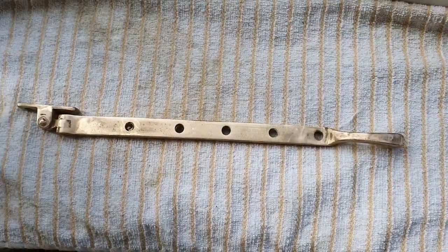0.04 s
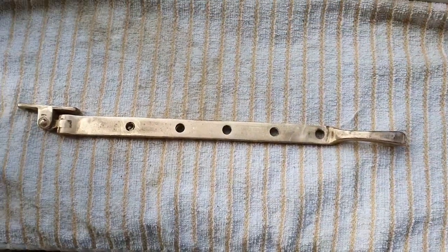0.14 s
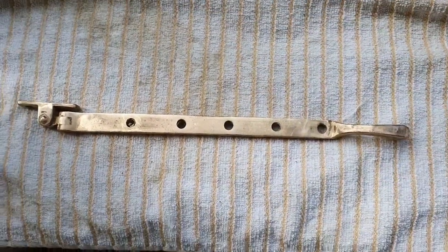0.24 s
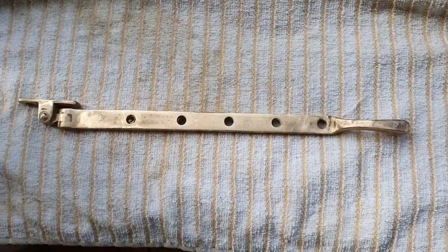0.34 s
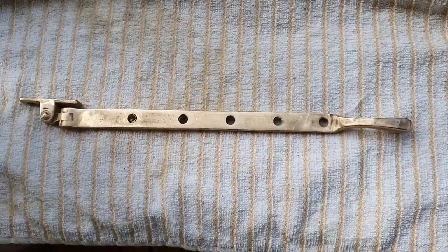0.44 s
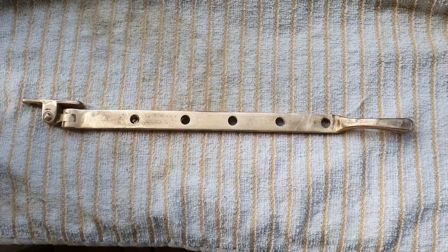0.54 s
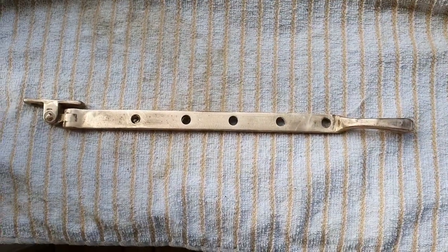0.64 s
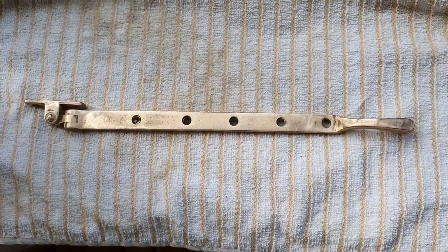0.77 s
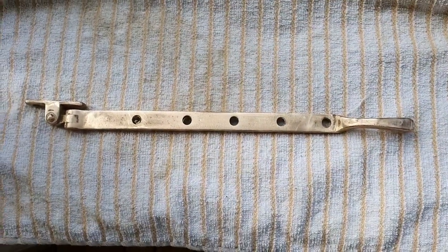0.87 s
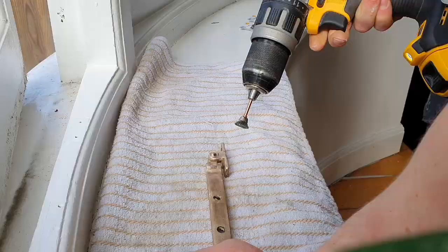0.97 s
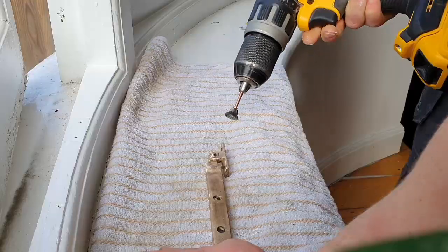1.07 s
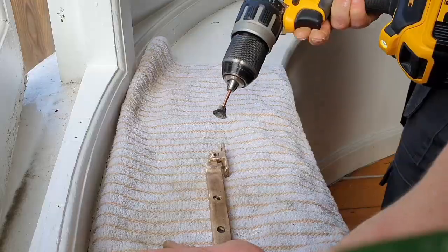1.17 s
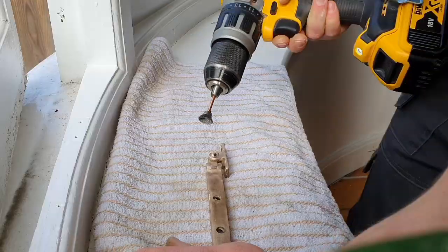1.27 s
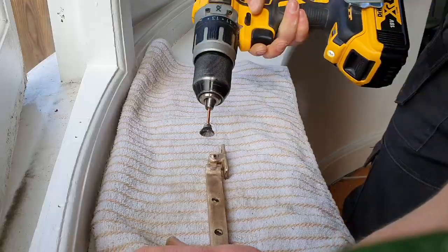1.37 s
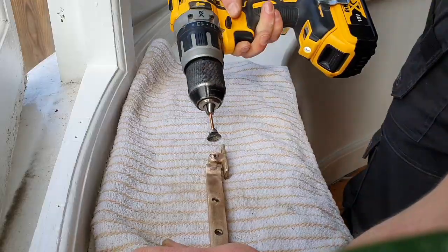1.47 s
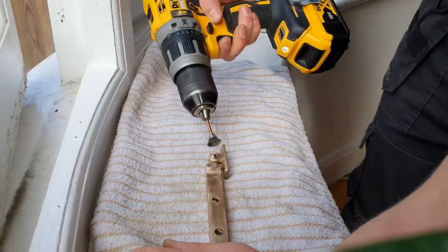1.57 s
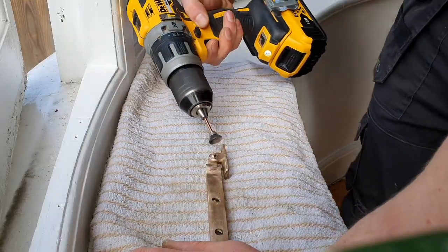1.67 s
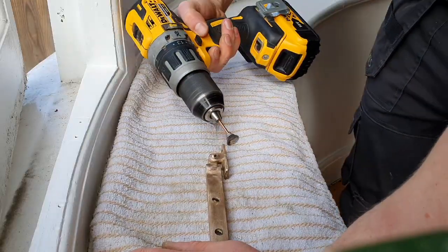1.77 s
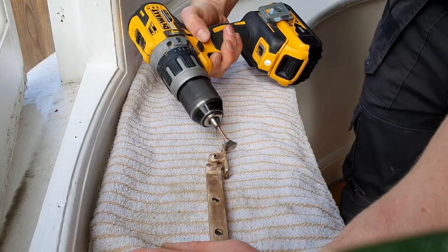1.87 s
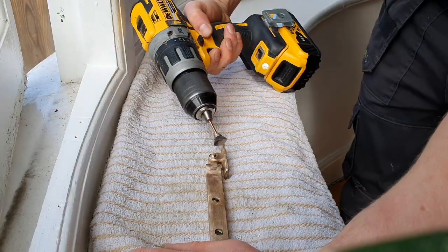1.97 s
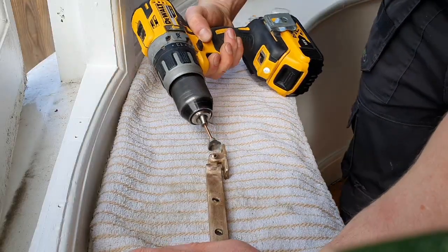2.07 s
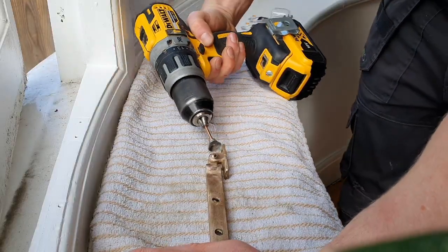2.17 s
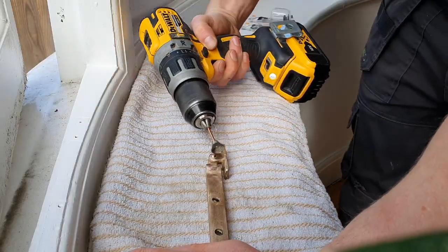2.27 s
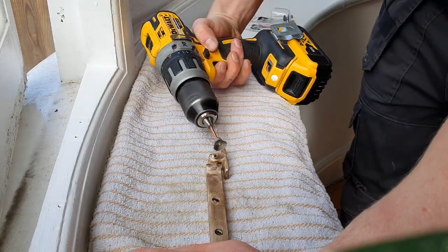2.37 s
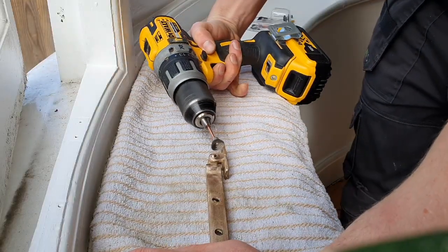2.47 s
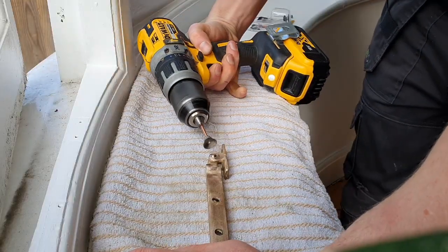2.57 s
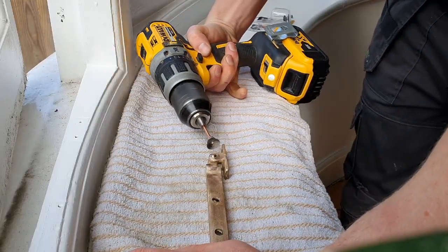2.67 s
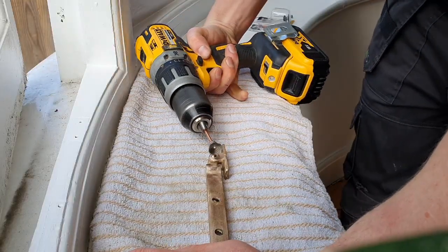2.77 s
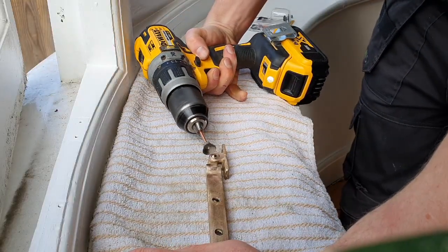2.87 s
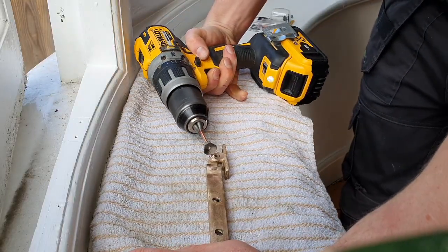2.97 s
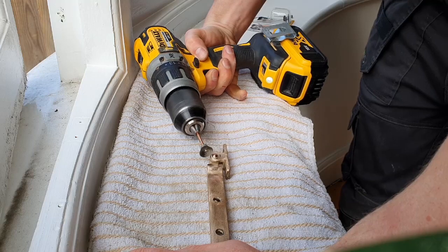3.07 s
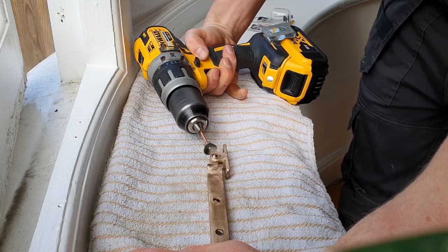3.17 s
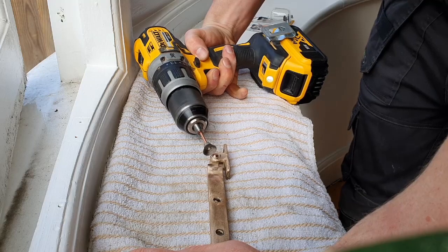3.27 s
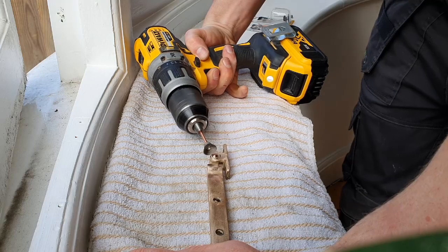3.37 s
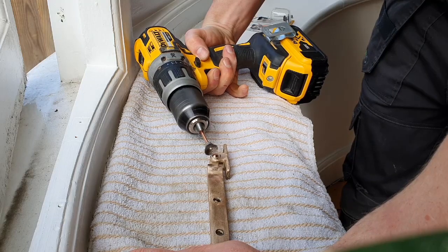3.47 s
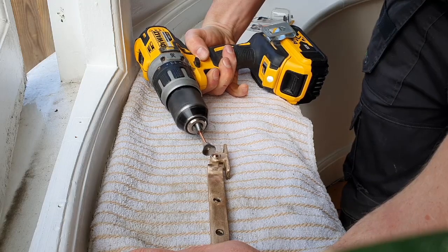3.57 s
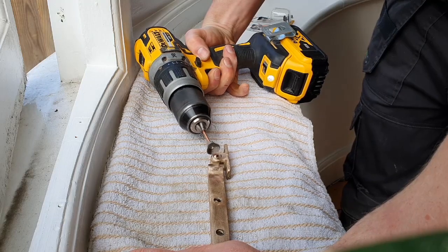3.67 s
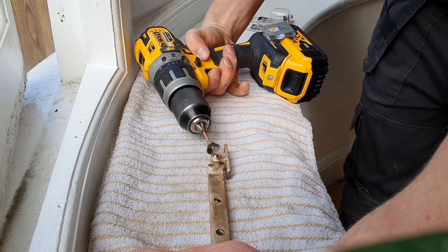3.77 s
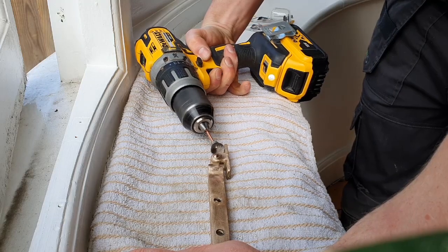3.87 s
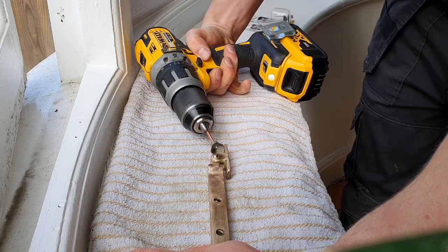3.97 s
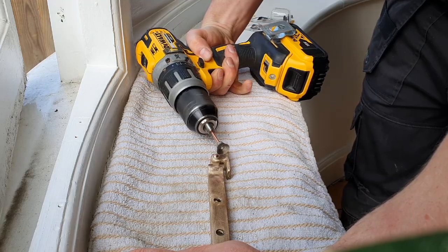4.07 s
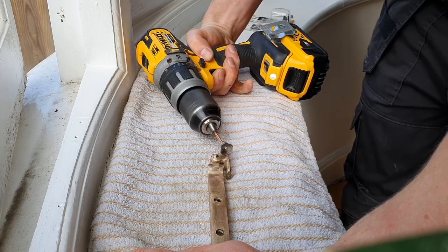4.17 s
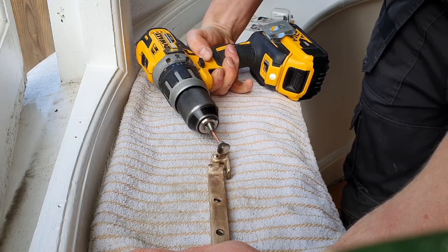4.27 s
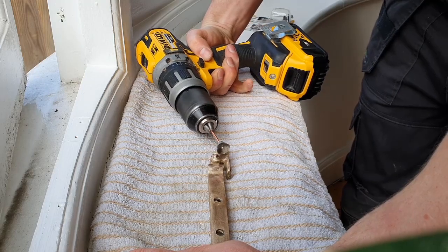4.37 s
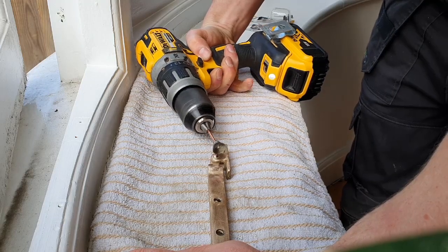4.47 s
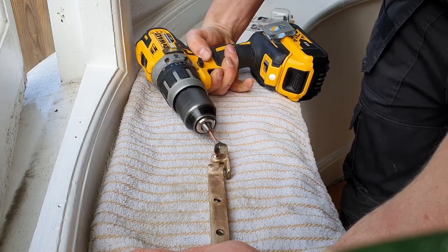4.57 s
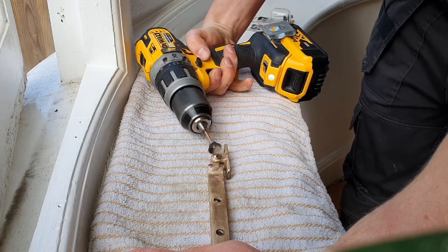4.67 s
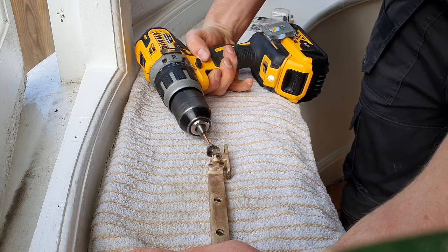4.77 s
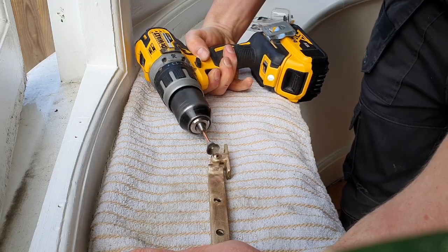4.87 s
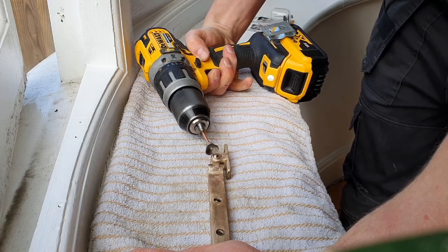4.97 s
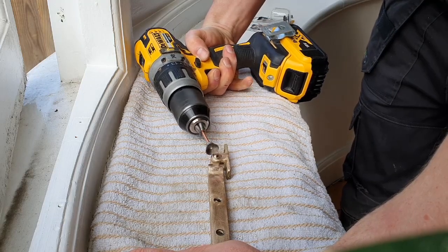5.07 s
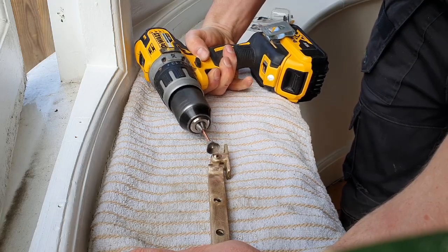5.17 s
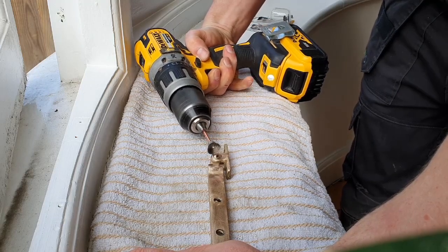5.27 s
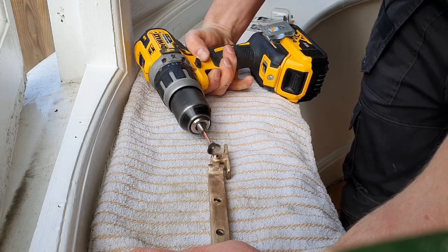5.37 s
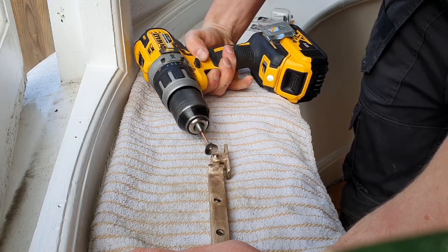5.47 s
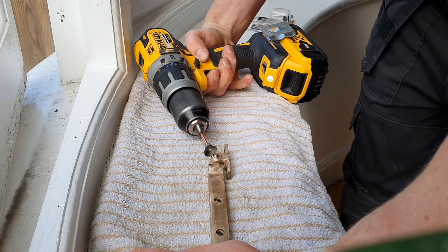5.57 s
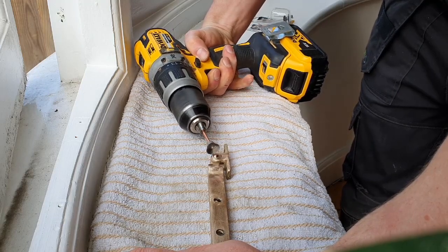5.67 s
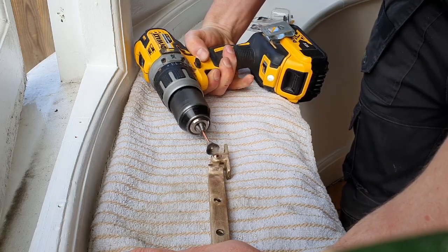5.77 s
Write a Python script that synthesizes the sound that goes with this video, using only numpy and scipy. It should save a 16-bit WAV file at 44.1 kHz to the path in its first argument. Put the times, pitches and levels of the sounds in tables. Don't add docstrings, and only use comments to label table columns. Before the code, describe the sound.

Stereo recording, indoors and close. First comes near-quiet with handling ticks, a small thump and faint low rumble. The scene cuts, clothing rustles, and a drill trigger clicks. The motor leaps to speed with a small overshoot, bright and ringing in free air, then grows fuller and rougher as the spinning wire brush settles onto a brass fitting and scours it without pause.

```python
import sys
import numpy as np
from scipy import signal
from scipy.fft import rfft, irfft
from scipy.io import wavfile
from scipy.ndimage import uniform_filter1d

SR = 44100
rng = np.random.default_rng(int(sys.argv[2]) if len(sys.argv) > 2 else 0)


def transcribe(signal):
    frames = np.atleast_2d(signal).T
    limited = np.clip(frames, -1, 1)
    pcm = np.round(limited * 32767).astype(np.int16)
    wavfile.write(sys.argv[1], SR, pcm)


def boost_factor(decibels):
    exponent = np.asarray(decibels, float) / 20
    return 10 ** exponent


N = 257103
T = np.arange(N) / SR
HZ = np.fft.rfftfreq(1024, 1 / SR)

# (time [s], speed [turns/s])
SPEED = [(1.608, 10), (1.65, 80), (1.68, 165), (1.70, 290), (1.72, 414), (1.73, 418.5), (1.755, 409.5),
         (1.78, 406), (1.85, 405.2), (5.83, 405.2)]
FULL_SPEED = SPEED[-1][1]
# (time [s], effort [dB], swing to the left [dB], treble [dB])
TRIGGER = [
    (1.612, -50, -2, -4),
    (1.615, -21.5, -6, 0.5),
    (1.645, -12, 0, -2.5),
    (1.67, -9, 2, -1),
    (1.70, -5.5, 1, 2),
    (1.73, -3, 0.5, 1.46),
]
GAP_START, GAP_END = 1.015, 1.029


def evened(x):
    return x / np.sqrt(np.mean(x ** 2) + 1e-20)


def read(points, hz=HZ):
    f, *columns = np.transpose(points)
    return np.squeeze([np.interp(np.log(hz + 1), np.log(f + 1), c) for c in columns])


def follow(rows, t=T):
    s, *columns = np.transpose(rows)
    return np.array([np.interp(t, s, c) for c in columns])


def sides(db, left_db):
    return boost_factor(db) * np.sqrt(2 / (1 + boost_factor(np.multiply.outer([-2, 2], left_db))))


def drift(hz, count):
    z = rfft(rng.standard_normal((count, 4096)))
    z[:, np.fft.rfftfreq(4096, N / SR / 4096) > hz] = 0
    slow = evened(irfft(z))
    return np.array([np.interp(T, np.linspace(0, N / SR, 4096), s) for s in slow])


def noise(db, same, lead=0 * HZ):
    _, t, (a, b) = signal.stft(rng.standard_normal((2, N)), SR, nperseg=1024, noverlap=768)
    same = np.clip(same, -1, 1)[:, None]
    right = same * np.exp(-1j * lead)[:, None] * a + np.sqrt(1 - same ** 2) * b
    z = np.array([a, right]) * boost_factor(db(t)) * np.sqrt(SR / 2)
    return signal.istft(z, SR, nperseg=1024, noverlap=768)[1][:, :N]


def steady(colour, same):
    x = noise(lambda t: read(colour)[:, None], same + 0 * HZ)
    return x / np.std(x.mean(0))


def bells(width, centre):
    return np.exp(-.5 * ((HZ - centre) / width) ** 2)


def drill():
    angle = shaft()
    effort_db, left_db = handling()[:2]
    gain = boost_factor(effort_db + 0.24 * drift(15, count=1) + np.outer([.5, -.5], left_db))
    gain = gain * (T > TRIGGER[0][0])
    return gain * (hiss(angle) + motor(angle) + stages(angle))


def handling(t=T):
    # (time [s], share still in the air [0-1])
    lowering = [(1.61, 0), (1.65, 0.2), (1.68, 0.93), (2.1, 0.9), (2.3, 0.58), (2.8, .25), (3.2, 0.08),
                (5.83, 0)]
    air_effort_db, air_treble_db, lean_db = -5.5, 1.2, -1.38
    effort_db, left_db, treble_db = follow(TRIGGER, t)
    free = np.clip(follow(lowering, t)[0], 0, 1)
    running = np.clip((t - TRIGGER[-1][0]) / 0.78, 0, 1)
    held = np.array([air_effort_db * free, lean_db + 0 * t, air_treble_db * free])
    starting = np.array([effort_db, left_db, treble_db])
    effort_db, left_db, treble_db = (1 - running) * starting + running * held
    return effort_db, left_db, free, treble_db


def shaft():
    hunting = 1 + 0.000984 * drift(25, count=1)[0]
    return 2 * np.pi * np.cumsum(follow(SPEED)[0] * hunting) / SR


def motor(angle):
    # (multiple of shaft [-], left [dB], right [dB], lead of the left [rad])
    orders = [(1, -43, -48, 1), (2, -33, -40, 1.05), (3, -34.5, -50, -7), (4, -33.5, -36.5, -0.8),
              (8, -28, -25.3, 2.95), (9, -40, -41, 3.1), (11, -42.5, -57.5, 1.2), (12, -39, -50, 1.2),
              (16, -53, -67, 12.5), (23, -26.5, -37.5, 1.77)]
    # (multiple [-], left in air [dB], right in air [dB], steepness [-])
    landing = [(4, -11.5, -6, 2.3), (2, 1, 6, 1), (9, 1, -21, 5)]
    # (time [s], gear whine left [dB], right [dB])
    facing = [(1.715, 2, -2), (1.75, 13, 3), (1.82, 9, 3), (1.87, 6, 1), (1.91, 11.5, 3), (2.22, 12.5, -1),
              (2.4, 6.5, 7.5), (2.53, 6, 5.5), (2.61, -4, 2), (2.66, 4.5, 10), (2.84, 8.5, 8),
              (2.9, -0.5, -1), (3.15, -1, -3), (3.6, 0, 3), (3.88, 3.5, 1), (4.18, 5, -7), (4.6, 2, -10),
              (4.95, 1.5, -8), (5.3, 2.5, -6), (5.83, 0.5, -9)]
    # (time [s], pole tone left [dB], right [dB])
    vents = [(1.70, 6, -2), (1.735, 17, 2), (1.78, 4, -1), (1.82, 9, -11), (1.92, 13.5, -12),
             (2.08, 1, -15), (2.25, 10, 1), (2.5, -5, 3.5), (2.8, 1, 1), (3.4, 1, 3), (4.3, 2.5, 1.5),
             (5.83, 1.5, 1.5)]
    poles, whine = 8, round(orders[-1][0])
    free, speed = handling()[2], follow(SPEED)[0]
    out = buzz(speed)
    beat = np.outer([0.18, 0.3], np.cos(2 * np.pi * 9.6 * (T - 3.1)))
    play = .58 * drift(40, count=2)
    wavers = drift(16, count=len(orders))
    turned = {}
    for (k, left_db, right_db, steep), slow in zip(landing, drift(8.2, count=len(landing))):
        turned[round(k)] = np.outer([left_db, right_db], free ** steep) + .5 * slow
    turned[whine] = follow(facing)
    turned[poles] = follow(vents)
    sway = .14 * drift(9, count=1)[0]
    for (k, left_db, right_db, lead), waver in zip(orders, wavers):
        is_pole = round(k) == poles
        level_db = np.array([[left_db], [right_db]]) + turned.get(round(k), 0)
        level = boost_factor(level_db + 1.4 * waver / (1 + is_pole)) * (1 + beat * is_pole)
        level = level * np.minimum(speed / speed[-1], 1) ** (.75 * (k + 1))
        blur = (k / orders[-1][0]) ** 2 * play
        phase = round(k) * angle + blur[1] - np.outer([0, 1], lead + sway)
        out += np.sqrt(2) * level * (1 + 0.33 * blur[0]) * np.sin(phase)
    return out


def buzz(speed):
    # (time [s], buzz [dB])
    contact = [(1.9, -8), (2.2, -14), (2.5, -13), (2.6, 0.5), (3.3, -1.5), (3.6, -2), (3.78, -14),
               (4.0, -1), (4.3, 0.5), (5.4, -1), (5.55, -6), (5.83, 0)]
    level = boost_factor(-49.5 + 0.94 * drift(6.1, count=1) + follow(contact))
    low = level * np.sin(2 * np.pi * 100 * T + 0.2 * drift(4, count=1)) * sides(0, 12)[:, None]
    fourth = np.sqrt(2) * boost_factor([-53.5, -57])[:, None] * np.sin(2 * np.pi * 400.3 * T + 1.1)
    return low + fourth * (speed / speed[-1]) ** 4


def hiss(angle):
    # (frequency [Hz], left, right [dB/Hz], left, right change in the air [dB], left-right likeness [-1 to 1])
    broadband = [(206, -77, -89, -21, 0, 0.83), (334, -70.5, -73.5, 6, 0, 1),
                 (580, -65.5, -72, -2.5, 4, 0.55), (780, -57, -58.5, -0.5, -5.5, 0.76),
                 (1048, -50.5, -61, -2.5, 0, 0.21), (1600, -55, -56.5, -3, -2, 0.79),
                 (2200, -56.5, -60, 4, 6, 0.25), (3220, -53, -59.5, 5.5, 7, 0.21),
                 (3330, -50.5, -58, 7.5, 9, 0.73), (3780, -52.5, -61.5, 5, 8.5, 0.5),
                 (4140, -53, -63, 5, 9, 0.31), (6400, -53.5, -67.5, 2.5, 7.5, 0.18),
                 (8580, -57, -71.5, 0.5, 6.5, 0.35), (10200, -61.5, -69.5, 4.5, 1, 0.18),
                 (12500, -61, -66, 2, 0.5, 0.17), (15400, -63, -82, 0.5, 1.5, 0.2)]
    # (frequency [Hz], width [Hz], left [dB],
    # right [dB])
    resonances = [(510.0, 240.0, 0.0, 2.5), (640.0, 140.0, 2.5, 2.0), (760.0, 110.0, 1.5, -3.0),
                  (880.0, 100.0, -5.5, -3.5), (1120.0, 350.0, -2.0, -1.0), (1340.0, 190.0, 3.0, -2.5),
                  (1550.0, 90.0, -1.5, -2.0), (1850.0, 140.0, -3.5, -1.5), (2070.0, 130.0, 2.5, 0.0),
                  (2510.0, 110.0, 2.0, -2.0), (2700.0, 220.0, 5.0, 2.0), (2740.0, 550.0, -6.5, -3.0),
                  (3150.0, 160.0, -4.0, -1.0), (3300.0, 90.0, 1.0, 1.5), (3830.0, 350.0, 2.5, 4.0),
                  (3940.0, 350.0, -0.5, -4.0), (5070.0, 390.0, -2.0, -4.5), (5290.0, 160.0, 1.0, -0.5),
                  (5500.0, 200.0, -3.0, -2.0), (6090.0, 660.0, -0.5, -2.0), (6770.0, 580.0, 1.5, 3.0),
                  (7130.0, 170.0, -2.0, -1.5), (7280.0, 420.0, -0.5, 4.5), (7730.0, 450.0, 3.0, 1.5),
                  (8030.0, 190.0, -1.0, -3.0), (8290.0, 640.0, 1.5, 1.0), (8700.0, 1350.0, 1.0, 3.0),
                  (10110.0, 750.0, -4.0, -9.0), (10150.0, 290.0, 1.5, 6.5), (10850.0, 340.0, -2.0, 1.5),
                  (11510.0, 300.0, 1.0, 3.0), (12520.0, 1130.0, -0.5, -3.5), (13300.0, 390.0, 2.5, 0.5),
                  (14620.0, 1470.0, 8.5, 3.0), (14620.0, 800.0, -4.0, -3.0), (15560.0, 600.0, 1.5, 4.5)]
    # (frequency [Hz], width [Hz], level [dB], held until [s], fade [s])
    free_ring = [(3610, 290, 3.5, 1.95, 0.2), (3680, 200, 6, 1.69, .012), (3000, 340, 5.5, 1.88, .06)]
    # (frequency [Hz], lead [rad])
    port_lead = [(0, -7), (860, 0.82), (1550, 5), (3190, 9.3), (3790, 9.7), (4910, 8.2), (6720, 8.8),
                 (9040, 9.4), (9300, 11.8), (9560, 9.6), (11000, 10.4), (11800, 9.6), (13300, 11.6),
                 (16600, 11)]
    # (frequency [Hz], depth [0-1])
    throb = [(5000, 0.06), (9000, 0.04), (11000, 0.1), (13000, 0.2), (15000, .24)]
    left, right, free_left, free_right, same = read(broadband)
    shape = sum(np.outer([l, r], bells(w / 2.92, f)) for f, w, l, r in resonances)
    fixed_db = (shape + [left, right])[..., None]
    air_db = np.array([free_left, free_right])[..., None]

    def field(t):
        free, treble_db = handling(t)[2:]
        patches = uniform_filter1d(rng.standard_normal((len(HZ), len(t))), 9, 0)
        patches = uniform_filter1d(patches, 14, 1)
        ring = 0
        for hz, width, ring_db, held, fade in free_ring:
            decay = np.exp(-(np.maximum(t - held, 0) / fade) ** 2)
            ring = ring + ring_db * np.outer(bells(width / 2.6, hz), decay)
        tilt = np.clip(np.log2((HZ + 1) / 3500), -1.5, 1.5)[:, None] ** 2 * treble_db
        return fixed_db + air_db * free + tilt + ring + 0.45 * evened(patches)

    x = noise(field, same, read(port_lead))
    throb_filter = signal.firwin2(129, HZ, np.clip(read(throb), 0, 1), fs=SR)
    treble = signal.oaconvolve(x, throb_filter[None], "same")
    brush_angle = angle / 8.435
    return x + treble * (np.cos(brush_angle) + .3 * np.cos(2 * brush_angle))


def stages(angle):
    # (frequency at full speed [Hz], left [dB], right [dB])
    stage_tones = [(40.4, -62, -61), (74.4, -56.5, -62), (132, -63, -66), (166, -64.5, -64.5),
                   (204, -62.5, -63), (300.1, -63.5, -65), (356, -62, -67), (592, -49.5, -56),
                   (663, -49, -59), (679, -43, -51), (712, -58, -55), (728, -47, -56), (783, -42, -49),
                   (802, -40, -58), (970, -50.5, -49), (973, -48.5, -55), (1012, -43, -47),
                   (1056, -46, -55), (1067.9, -45.5, -56), (1074, -46, -54), (1448, -48, -56),
                   (1900, -56, -50), (1990, -53, -47), (2076.6, -47, -61)]
    out, turn = np.zeros((2, N)), angle / FULL_SPEED
    for hz, left_db, right_db in stage_tones:
        a, b = 0.76 * drift(4, count=2)
        tone = (1 + a) * np.sin(hz * turn) + b * np.cos(hz * turn)
        out += boost_factor(np.array([[left_db], [right_db]])) * tone
    return out * (follow(SPEED)[0] / FULL_SPEED) ** 4


def place(out, s, db, left_db, x):
    out[:, round(s * SR):][:, :len(x)] += np.outer(sides(db, left_db), x)


def clicks():
    # (time [s], peak [dB], ring [Hz], left-right [dB], ring decay [ms])
    creaks = [(0, -21.5, 980, -12, 1.4), (.0033, -33, 986, -16, 6.3), (.0005, -44, 3400, -12, 8.1),
              (0, -40, 6800, -16, 1), (.004, -42.5, 7000, -16, 2), (0, -35, 12000, -15, .5),
              (.005, -35, 10600, -18, 1), (.0127, -29, 15000, -22, .3), (0.0395, -37, 2800, -15, 0.37),
              (.1600, -47, 3000, -15.5, 0.36), (0.191, -11, 2100, -24.5, 0.3),
              (0.1914, -13.5, 2950, -28, 0.41), (.1025, -38, 1500, -15, .4), (.1128, -35, 2500, -16, .4),
              (.1155, -34, 1500, -17, 0.64), (.1185, -37, 3500, -18, .4), (0.1924, -24, 7300, -16.5, 0.38),
              (.1922, -5.5, 3600, -29, 0.34), (.1993, -39, 6500, -15, .3), (0.201, -22.5, 1300, -9, 0.23),
              (.3998, -53, 7500, -18, .3), (.7778, -64, 7000, -19, .3), (0.9695, -35.5, 1720, -11, 0.94),
              (0.9697, -45, 3600, -21, 0.6), (.9832, -57, 7500, -20, .3), (.9970, -53, 6500, -18, .2),
              (1.6135, -36, 5500, 11, 0.72), (1.628, -17, 3500, 0.5, 0.25)]
    out, t = np.zeros((2, N + 4000)), np.arange(4000) / SR
    for s, db, hz, left_db, decay_ms in creaks:
        ring = np.sin(2 * np.pi * hz * t) * np.exp(-1000 * t / decay_ms) * 2 * (1 - np.exp(-t / 0.00018))
        tick = (min(hz, 7000) / 7000) ** 3 * rng.standard_normal(len(t)) * np.exp(-t / 0.00029)
        place(out, s, db, left_db, ring + tick)
    return out[:, :N]


def thumps():
    # (time [s], level [dB], swing [Hz], left-right [dB], rise [ms], decay [ms])
    jolts = [(0.1935, -15, 70.5, -10.5, 0.36, 9.3), (0.203, -20, 105, -16.5, 3, 10.5),
             (0.972, -29.5, 70, -14, 1.5, 18), (1.587, -28, 124, 1, 4.4, 11), (1.628, -25, 91, 0, 2.2, 7.2),
             (1.743, -24.5, 120, 5, 5, 10.5), (1.765, -16.5, 114.7, 5, 5, 10.5),
             (1.808, -21.5, 81.4, 4, 4.5, 15), (1.854, -20, 98, 3, 5, 14), (.002, -18.5, 95, -14, 2, 4.1)]
    out, t = np.zeros((2, N + 4000)), np.arange(4000) / SR
    for s, db, hz, left_db, rise_ms, decay_ms in jolts:
        envelope = np.exp(-1000 * t / decay_ms) + 2.0 * np.exp(-t / 0.0017)
        envelope = envelope * (1 - np.exp(-1000 * t / rise_ms))
        place(out, s, db, left_db, -np.sin(2 * np.pi * hz * t + 1.89) * envelope)
    return out[:, :N]


def slides():
    # (time [s], length [s], level [dB], edge of the dull part [Hz], its lift [dB])
    strokes = [
        (-.025, 0.046, -32.5, 1310, -4),
        (0.0925, 0.012, -52, 3000, -1),
        (0.096, 0.026, -46.5, 4500, 0),
        (0.103, 0.031, -52, 4460, 4.5),
        (0.138, .045, -71, 4230, 18),
        (0.177, .024, -60.5, 5030, 20.5),
        (0.31, 0.042, -65.5, 4460, 9.5),
    ]
    # (frequency [Hz], level [dB/Hz])
    skin_colour = [(120, -33), (200, 12), (244, -14), (665, -2), (783, -9), (1620, -1.5), (2210, -6),
                   (4030, -6.5), (8660, -18), (15500, -16)]
    grit = steady(skin_colour, 0.74) * boost_factor(4.3 * drift(400, count=1))
    out = np.zeros((2, N))
    for s, length, db, edge_hz, lift_db in strokes:
        dull = signal.lfilter(*signal.butter(3, edge_hz, fs=SR), grit)
        push = np.sin(np.pi * np.clip((T - s) / length, 0, 1) ** 0.91) ** 0.8
        out += sides(db, -36.5)[:, None] * push * (grit + boost_factor(lift_db) * dull)
    return out


def squeak():
    # (time [s], frequency [Hz], level [dB])
    whistle = [(.52, 6850, -92), (.54, 7400, -80), (.575, 7550, -84), (.605, 7200, -76), (.64, 7350, -80),
               (.67, 6950, -94)]
    hz, db = follow(whistle)
    fuzzy_hz = hz * (1 + 0.037 * drift(400, count=1)[0])
    tone = np.sin(2 * np.pi * np.cumsum(fuzzy_hz) / SR)
    sounding = (T > whistle[0][0]) * (T < whistle[-1][0])
    return sides(0, -19.0)[:, None] * boost_factor(db + 1) * tone * sounding


def cloth():
    # (start [s], length [s], level [dB], left-right [dB], treble lift [dB])
    rustles = [(-.05, 0.2, -70, -10, 0.5), (.13, 0.08, -78, -10, 12), (0.23, 0.31, -71, -9, 3.5),
               (.5, 0.6, -80, -2, 1), (0.97, .06, -74, -11, 3), (1.023, 0.17, -66.5, 1, 9),
               (1.06, .1, -64, 4, 10), (1.122, 0.35, -63, 12, 7.5), (1.331, 0.14, -74, 14, 14),
               (1.465, 0.42, -67, 10, 7)]
    # (frequency [Hz], level [dB/Hz])
    weave_colour = [(880, -35), (1500, -2.5), (2240, 5.5), (3410, 2), (5400, -8), (6620, -11.5),
                    (7520, -16.5), (11900, -19), (15500, -21)]
    weave = steady(weave_colour, 0.047)
    fizz = signal.lfilter(*signal.butter(2, 6000, "high", fs=SR), weave)
    out = np.zeros((2, N))
    for s, length, db, left_db, treble_db in rustles:
        swell = abs(np.sin(np.pi * np.clip((T - s) / length, 0, 1) ** 0.29)) ** 0.72
        out += sides(db, left_db)[:, None] * swell * (weave + (boost_factor(treble_db) - 1) * fizz)
    return out


def rumble():
    # (time [s], level [dB])
    grip = [(0.0, -41), (0.052, -49), (0.214, -48.5), (0.484, -49.5), (0.95, -63), (1.02, -47),
            (1.176, -46), (1.368, -54), (1.706, -48), (1.946, -45), (2.054, -56), (2.1, -53), (2.4, -56.5),
            (5.83, -54.5)]
    # (time [s], left-right [dB])
    grip_side = [(1.0, -6), (1.04, 0.5), (1.75, 0.5), (2.4, -1)]
    # (frequency [Hz], level [dB/Hz])
    body_colour = [(12, -56), (20, -24.5), (44, -8.5), (65, -6), (92, 1.5), (118, -17), (203, -13),
                   (238, -19.5), (500, -20.5), (650, -64.5), (1100, -120)]
    return sides(follow(grip)[0], follow(grip_side)[0]) * steady(body_colour, 0.97)


def drone():
    # (time [s], frequency [Hz], level [dB])
    engine = [(0.0, 65.7, -47), (0.074, 62.6, -49.5), (0.186, 64.8, -49), (0.486, 63, -44.5),
              (0.56, 62.7, -65)]
    # (multiple [-], level [dB])
    overtones = [(1, 1.5), (2, -8), (3, -12)]
    hz, db = follow(engine + [(.62, 61.6, -90)])
    angle = 2 * np.pi * np.cumsum(hz) / SR
    return np.sqrt(2) * boost_factor(db) * sum(boost_factor(o_db) * np.sin(round(k) * angle) for k, o_db in overtones)


def room():
    # (frequency [Hz], level [dB/Hz])
    tones = [
        [(90, -33.5), (150, 1), (205, -6), (434, -22), (560, -6), (690, -8), (870, -10.5), (1150, -5.5), (1400, -14.5), (1950, -18), (2650, -28), (2850, -43.5), (4500, -56.5), (12000, -59.5), (15600, -77)],
        [(88, -53), (150, -4), (193, -7.5), (243, -3), (337, -19), (416, -18), (954, -7.5), (1770, -18), (1980, -19), (2400, -27.5), (15000, -57)],
    ]
    # (frequency [Hz], left-right likeness [-1 to 1])
    likeness = [(60, 0.97), (240, 0.95), (950, -0.13), (3770, -0.078), (15000, -0.0)]
    before, after = (boost_factor(db) * steady(c, read(likeness)) for c, db in zip(tones, (-57, -53.5)))
    return np.where(T < GAP_START, before, after)


def scene():
    return drill() + clicks() + thumps() + slides() + squeak() + cloth() + rumble() + drone() + room()


def roll_off(x):
    return signal.sosfilt(signal.butter(12, 15760, fs=SR, output="sos"), x)


def record(dry):
    ceiling, low_hz, high_hz = 1.3, 32, 15900
    x = ceiling * np.tanh(dry / ceiling)
    x = signal.sosfilt(signal.butter(2, low_hz, "high", fs=SR, output="sos"), x)
    lowpass = signal.firwin(767, high_hz, window=("kaiser", 9), fs=SR)
    x = signal.oaconvolve(x, lowpass[None], "same")
    fade_out, fade_in = (GAP_START - T) / 0.0027, (T - GAP_END) / 0.0031
    mix = x * np.clip(np.maximum(fade_out, fade_in), .002, 1)
    return roll_off(mix)


dry = scene()
out = record(dry)
transcribe(out)
```